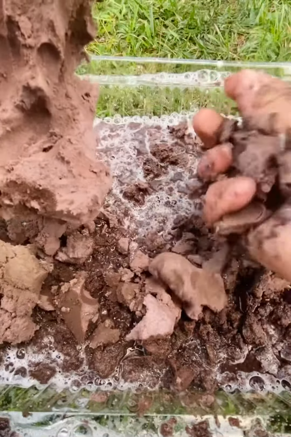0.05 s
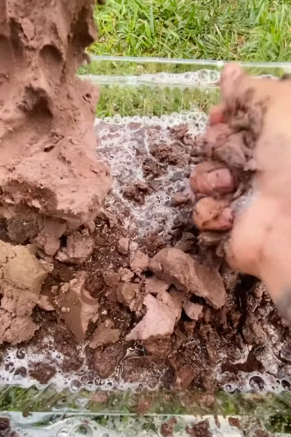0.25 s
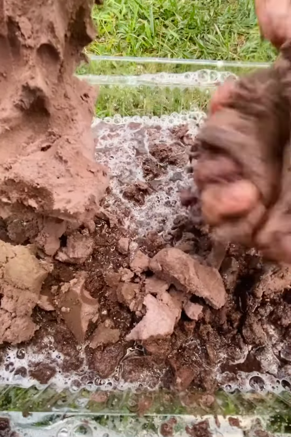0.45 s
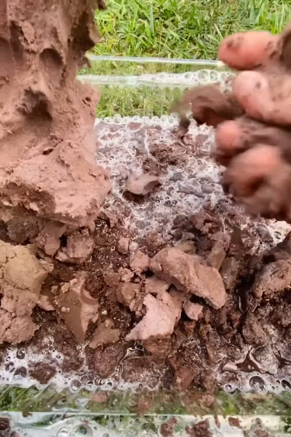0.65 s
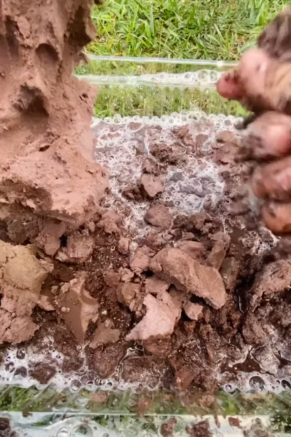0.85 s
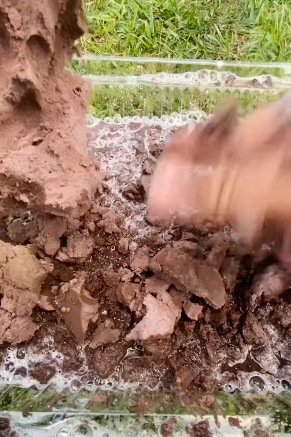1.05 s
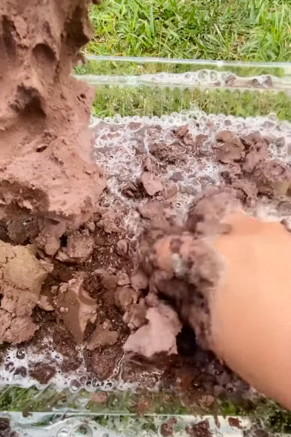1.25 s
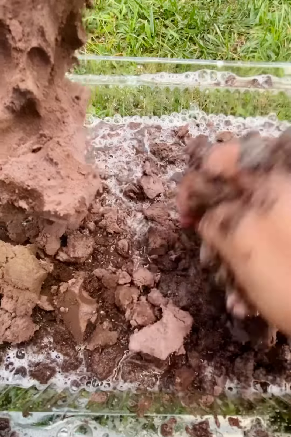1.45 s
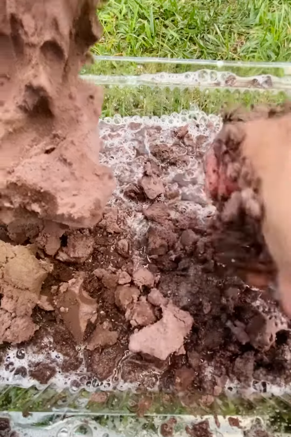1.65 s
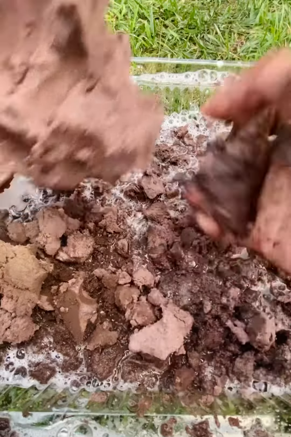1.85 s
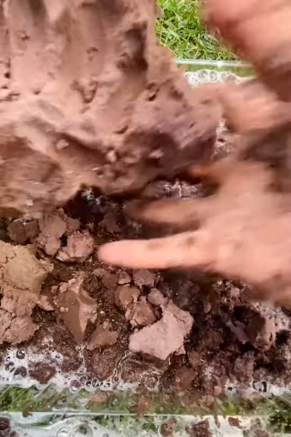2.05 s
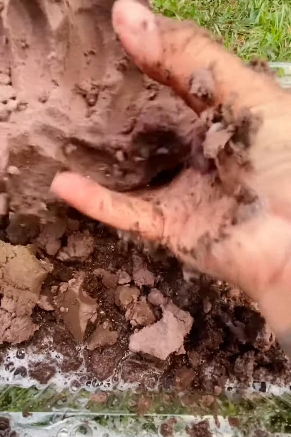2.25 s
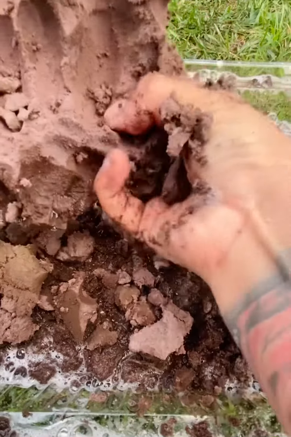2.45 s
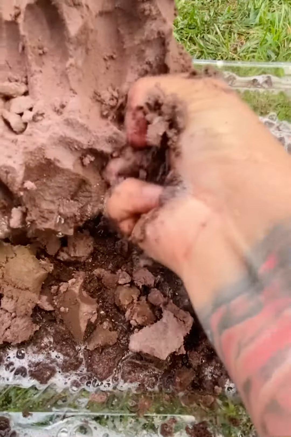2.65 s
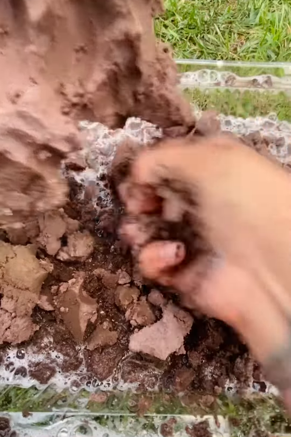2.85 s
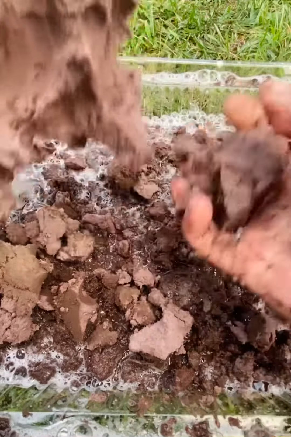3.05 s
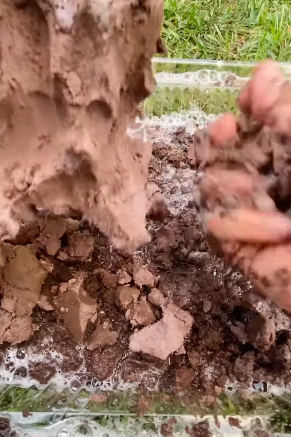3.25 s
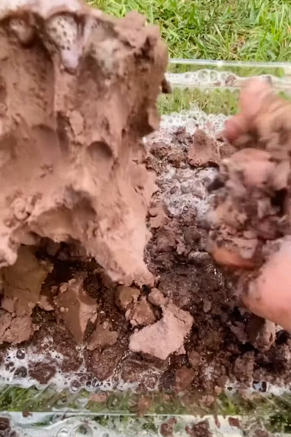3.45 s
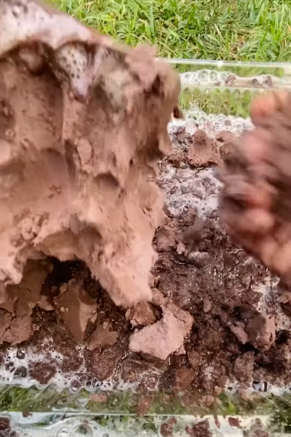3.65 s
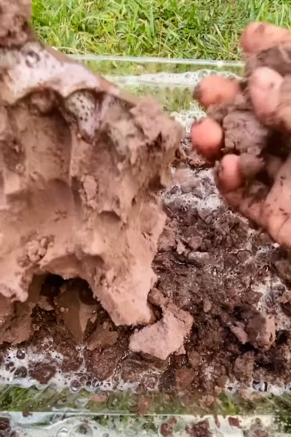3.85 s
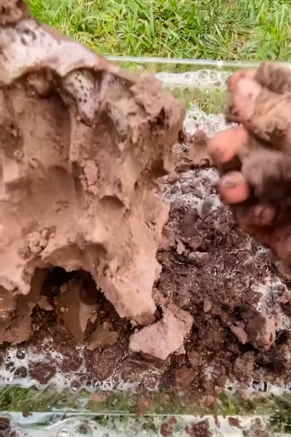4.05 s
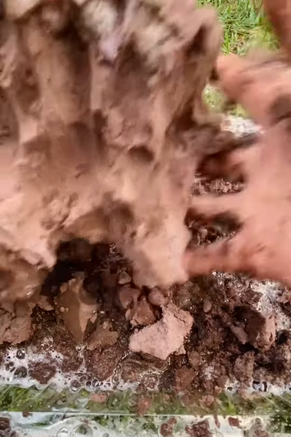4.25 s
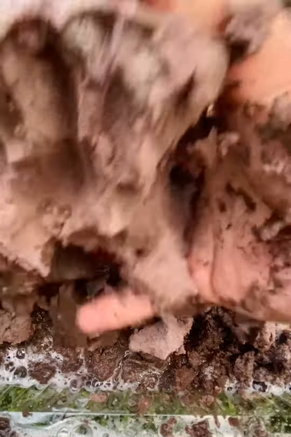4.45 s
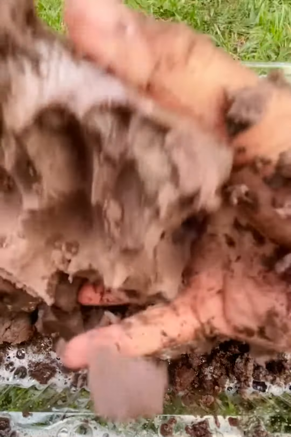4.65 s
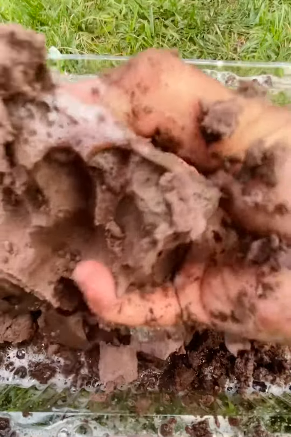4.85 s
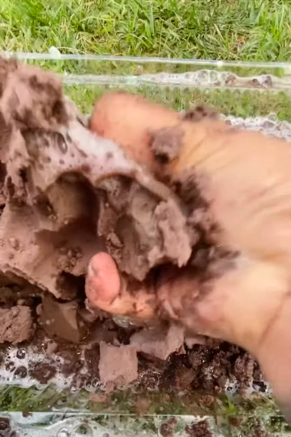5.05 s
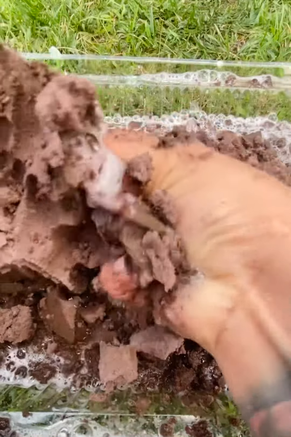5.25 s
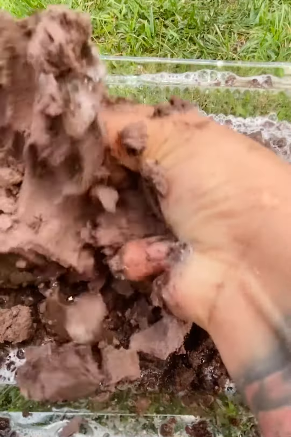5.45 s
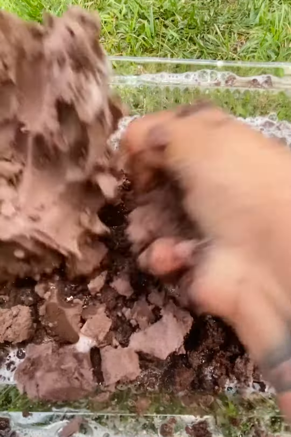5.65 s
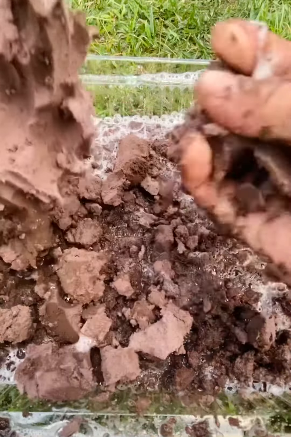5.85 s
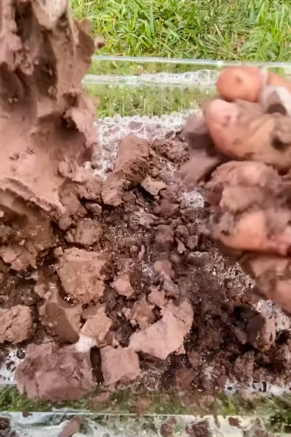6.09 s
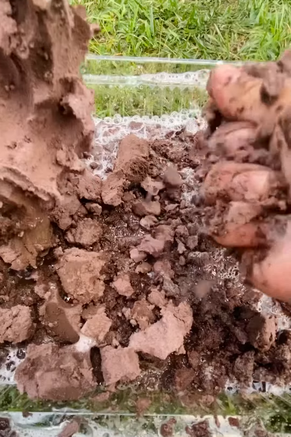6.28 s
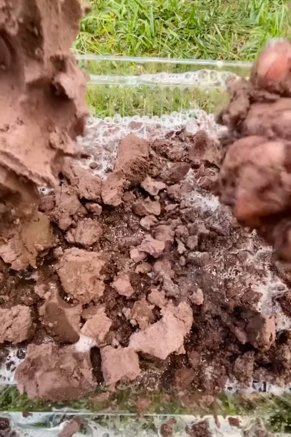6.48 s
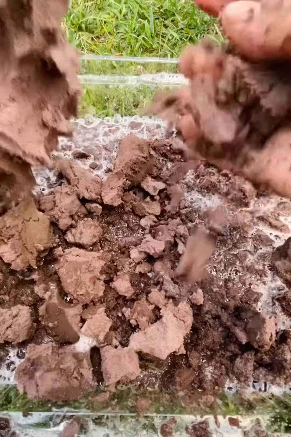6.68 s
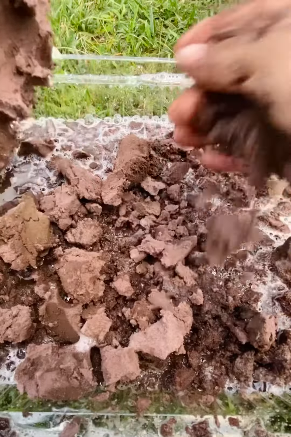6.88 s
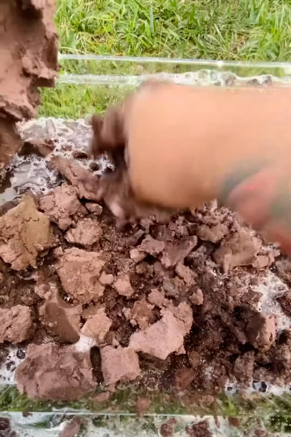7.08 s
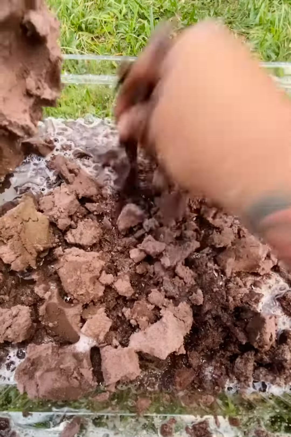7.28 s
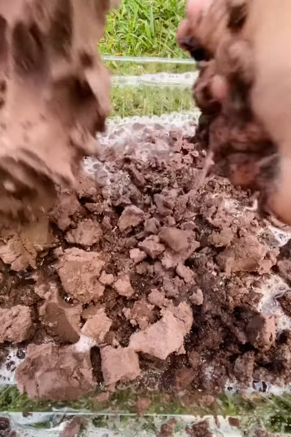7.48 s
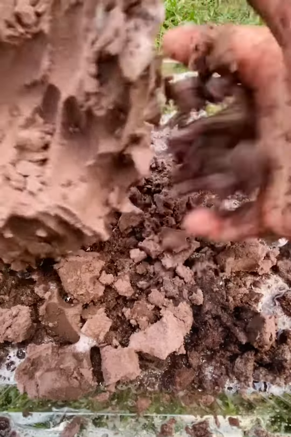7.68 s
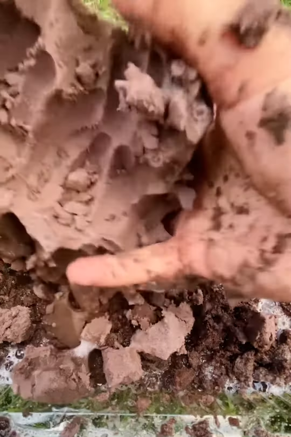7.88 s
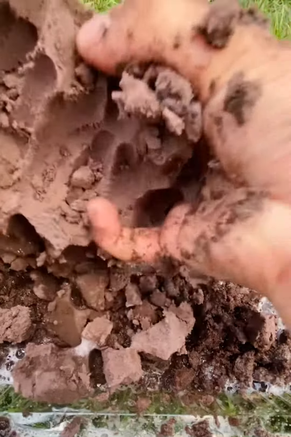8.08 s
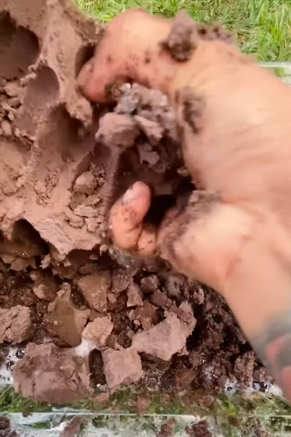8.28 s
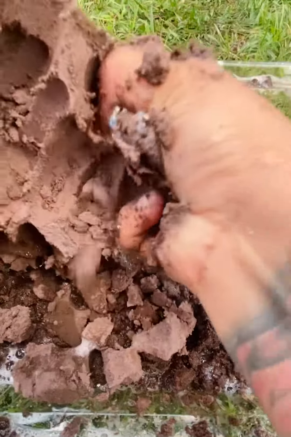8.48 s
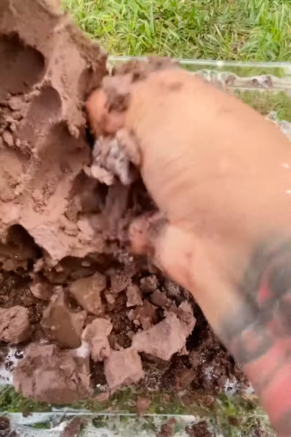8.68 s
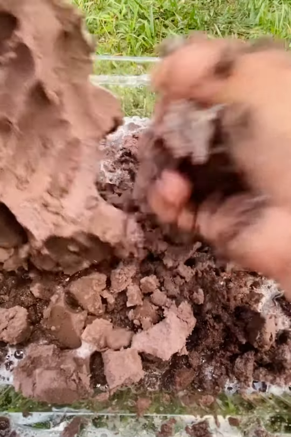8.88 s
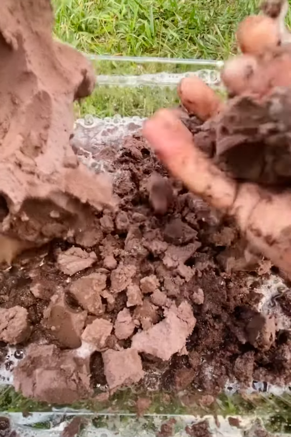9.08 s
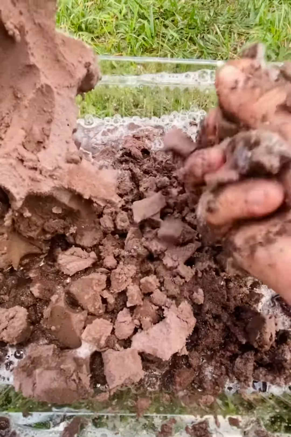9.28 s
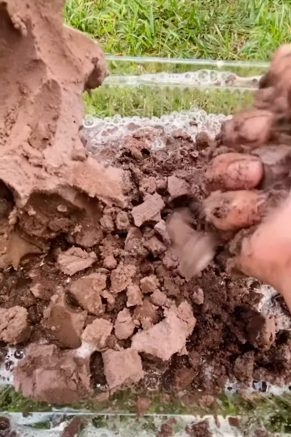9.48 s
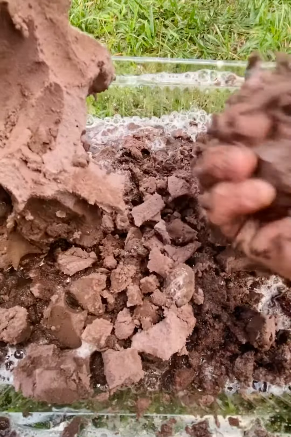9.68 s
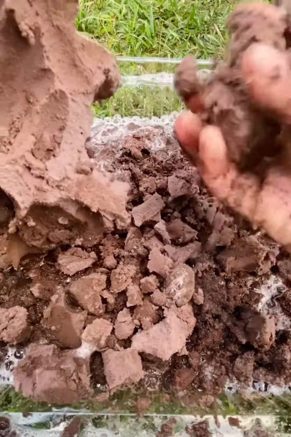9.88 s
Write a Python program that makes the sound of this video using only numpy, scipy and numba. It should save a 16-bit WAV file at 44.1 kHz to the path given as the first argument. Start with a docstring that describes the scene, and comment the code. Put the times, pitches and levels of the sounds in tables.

```python
"""Outdoors, a hand works a block of soaked floral foam over a soapy tub, close to a phone with two microphone ports.
A low distant rumble, hum and drone lie underneath throughout: filtered noise and wandering sine tones.
From the start the fist crushes lumps: noise ticks crackle and snap, suds squirt and pop, and crumbs plop.
Near 2.3, 4.7 and 7.9 s the fingers bite in and tear a lump off, adding a deeper crunch and damped thuds.
In the second and third tear the hollow of the palm rings as well; crushing resumes after each."""
import sys
import numpy as np
from scipy import signal
from scipy.fft import rfft, irfft, next_fast_len
from scipy.io import wavfile
from numba import njit

SR = 44100
rng = np.random.default_rng(int(sys.argv[2]) if len(sys.argv) > 2 else 0)


def waveform_to_disk(signal):
    """Save audio, clipped to [-1, 1], as 16-bit WAV at the path in sys.argv[1]."""
    frames = np.transpose(np.atleast_2d(signal))
    scaled = np.clip(frames, -1, 1) * 32767
    samples = np.round(scaled).astype(np.int16)
    wavfile.write(sys.argv[1], SR, samples)


N = 437913
TIME = np.arange(N) / SR
FREQ = np.fft.rfftfreq(next_fast_len(N + SR // 4, True) // 2 * 2, 1 / SR)


def undb(db):
    """Decibels to gain."""
    return 10 ** (np.asarray(db) / 20)


def over_freq(hz, values):
    """Values joined on a log-frequency axis."""
    return np.interp(np.log(FREQ + 1), np.log(hz), values)


def filtered(x, response):
    """Apply a frequency response."""
    return irfft(rfft(x, 2 * (len(FREQ) - 1)) * response)[..., :N]


def colour(x, points):
    """Causal filter through (Hz, dB) points that keeps the power of white noise."""
    gain = undb(over_freq(*np.transpose(points)))
    # folding the cepstrum gives minimum phase: no sound before the break
    cepstrum = irfft(np.log(gain / np.sqrt(np.mean(gain ** 2))))
    half = len(cepstrum) // 2
    cepstrum[1:half] *= 2
    cepstrum[half + 1:] = 0
    return filtered(x, np.exp(rfft(cepstrum)))


def walk(rate):
    """Smooth random wander with a spread near 1, taking `rate` new values per second."""
    steps = rng.standard_normal(N // 20)
    return np.interp(TIME * rate, np.arange(len(steps)), steps) * np.sqrt(3 / 2)


def ring_down(power, decay_s):
    """Let each packet of energy die away exponentially; decay_s is that of the amplitude."""
    keep = np.exp(-2 / (decay_s * SR))
    return signal.lfilter([1 - keep], [1, -keep], power + 1e-18)


@njit
def resonance(x, hz, width):
    """Band-pass whose centre may move with every sample; width is bandwidth over centre."""
    y, band, low = np.empty(len(x)), 0., 0.
    for i in range(len(x)):
        g = np.tan(np.pi * min(hz[i] / SR, .45))
        v = (band + g * (x[i] + 1e-18 - low)) / (1 + g * (g + width))
        band, low, y[i] = 2 * v - band, low + 2 * g * v, width * v
    return y


def ringing(pair, hz, width):
    """Both streams through the same resonance."""
    return np.array([resonance(x, hz * np.ones(len(x)), float(width)) for x in pair])


# Rumble far from the microphone. Each row: frequency in Hz, relative density in dB per Hz.
RUMBLE_SPECTRUM = [(20, -25.5), (40, -10), (55, 0), (70, 5), (100, -0.5), (130, 1), (200, -6), (260, -10),
                   (380, -18), (560, -29), (1200, -49.5), (3000, -51), (11000, -52), (15000, -84)]
# Distant machine hum. Each row: frequency in Hz, level in dB, both before a slight wander.
HUM_TONES = [(56, -50), (120, -59.5), (177.5, -58.5), (237.5, -56), (297, -63.5), (335, -66.5)]
# Far-off engine drifting in speed. Each row: time in seconds, frequency in Hz, level in dB, before wander.
ENGINE_DRONE = [(0, 121, -48), (.9, 120.7, -54.5), (1.9, 144, -50), (3.3, 172.1, -55), (3.7, 134.6, -49),
                (4.05, 122.4, -46.5), (4.4, 122.1, -49.5), (5.1, 160.8, -50), (5.8, 150, -69),
                (7.4, 113.6, -67), (8, 113.5, -49), (8.9, 120, -47), (9.4, 123, -48.5), (9.93, 127.1, -48)]


def outdoors():
    """Far-off rumble as shaped noise, nearly alike at both ports in the bass; hum and engine as wandering sines."""
    swell_db = .6 * walk(5)
    mid, side = colour(rng.standard_normal((2, N)), RUMBLE_SPECTRUM) * undb(-44.0 + swell_db)
    side = filtered(side, undb(over_freq([60, 250, 700], [-27, -18, -4])))
    times, drone_hz, drone_db = np.transpose(ENGINE_DRONE)
    drone = (np.interp(TIME, times, drone_hz), np.interp(TIME, times, drone_db))
    hum = 0
    for hz, db in HUM_TONES + [drone]:
        level = undb(db + 1.3 * walk(2)) * np.sqrt(2)
        cycles = np.cumsum(hz + 0.3 * walk(4)) / SR
        hum = hum + level * np.sin(2 * np.pi * cycles)
    return mid + hum + side * np.array([[1], [-1]])


# Soft wash in the distance. Each row: time in seconds, level in dB.
WASH_LEVEL = [(0, -61), (.3, -63.5), (.8, -69), (1.6, -60.5), (2.1, -68.5), (2.9, -65), (3.6, -76),
              (4.15, -63.5), (4.7, -70), (5.55, -66), (6.2, -77), (7, -68), (9.93, -72)]


def far_wash(hz=730, width=0.84):
    """A soft, distant midrange wash that slowly comes and goes: noise through two equal resonances."""
    wash = ringing(ringing(rng.standard_normal((2, N)), hz, width), hz, width)
    return wash / np.std(wash) * undb(np.interp(TIME, *np.transpose(WASH_LEVEL)))


# The clearest brittle snaps, close to the phone. Each row: start in seconds, relative level over a
# millisecond in dB, decay in seconds, body against treble in dB before colouring, ring of the piece in Hz.
CLEAR_SNAPS = [(0.0283, -20, 0.0021, -26, 9100), (0.0449, -16.5, 0.0034, -2.5, 9000),
               (0.061, -15, 0.0023, -10, 6400), (0.0856, -17, 0.0014, -3, 6800),
               (0.128, -20, 0.0009, -20, 5200), (0.139, -20, 0.0036, -20, 5500),
               (0.1791, -31, 0.0005, -9, 8500), (0.2704, -32, .001, -9, 4500),
               (0.32, -37, 0.00096, 1, 3800), (0.4118, -44, .001, -13, 4040),
               (1.2951, -23, 0.00094, -1, 3980), (1.391, -24, 0.0034, -1, 5600),
               (1.4375, -16, 0.00048, -33, 9000), (1.4955, -18, 0.0012, -25, 9400),
               (1.5029, -12.5, 0.00074, -30, 6100), (1.521, -14.5, 0.0013, -25, 9600),
               (1.7566, -37, .001, -10, 5500), (1.8733, -46, .001, -9, 4100),
               (2.0647, -23.5, 0.0055, -21, 7100), (2.0726, -27, 0.0023, -2, 7300),
               (2.1416, -28, 0.003, -21, 5300), (2.2949, -10.5, 0.001, -21, 5100),
               (2.3077, -12, 0.0028, -10, 7200), (2.3758, -14, 0.0011, 7, 1500),
               (2.3962, -9.5, 0.00058, -16, 8800), (2.4144, -8.5, 0.0024, -11, 8300),
               (2.4816, -7.5, 0.0019, -1, 3800), (2.5001, -6, 0.0011, -8, 6500),
               (2.5164, -11.0, 0.0016, 0, 2300), (2.5872, -3, 0.0018, -12, 5800),
               (2.5895, -4, 0.0017, -7, 5500), (2.5981, -3, 0.0039, -6, 5300),
               (2.6044, -3.5, 0.0025, -1, 2800), (2.6104, -3.5, 0.00093, 0, 2480),
               (2.6316, -12, 0.0043, -7, 9700), (2.712, -34, 0.0012, -10, 6000),
               (2.9178, -29.5, 0.0038, -16, 8700), (2.9723, -37, .002, -10, 2300),
               (3.0452, -34, 0.0011, -13, 5500), (3.151, -22, 0.0029, -8, 8900),
               (3.1669, -23.5, 0.004, -16, 5400), (3.197, -20, 0.0014, -12.5, 6160),
               (3.215, -17, 0.0035, 0, 5500), (3.2628, -15.5, 0.00097, 2, 5470),
               (3.2871, -17.5, 0.001, -12, 4300), (3.3104, -13, 0.0025, -7.5, 2420),
               (3.4074, -33, 0.00096, 0, 4500), (3.4722, -34, .0008, -17, 7870),
               (3.4902, -40, .001, -1.5, 5000), (3.4967, -27.5, .001, 0, 2500),
               (3.7706, -28, 0.00092, -23, 9900), (3.8039, -22, 0.004, -20, 9200),
               (3.8809, -22.5, 0.0017, -5, 5300), (3.8976, -19.5, 0.0037, -11, 5340),
               (3.921, -27, 0.0018, -11, 5500), (4.1045, -29, 0.0037, 0, 1318),
               (4.3851, -17.5, 0.0022, -12, 5170), (4.3899, -11, 0.0042, -9.5, 10000),
               (4.3955, -7, 0.0012, -25, 10200), (4.5054, -17.5, 0.0049, -17, 7800),
               (4.515, -16, 0.0029, -19, 8100), (4.6096, -36, .0008, -10, 6500),
               (4.6493, -15.5, 0.0031, -3, 6270), (4.6553, -17, 0.0026, -8, 4800),
               (4.6755, -19, 0.0006, -11, 6600), (4.7205, -11.5, 0.0012, -6, 5100),
               (4.7498, -13, 0.0022, -2.5, 2000), (4.7748, -6.5, 0.0011, -4, 7300),
               (4.7851, -16, 0.00099, 6, 6000), (4.7942, -12.5, 0.0025, 5, 1600),
               (4.8148, -7, 0.00076, -1, 8500), (4.8345, -5, 0.00067, -8, 5300),
               (4.9381, -29, 0.0018, -5, 3200), (5.0206, -3.5, 0.00069, -19, 7550),
               (5.0401, -20.5, 0.00078, -3, 2400), (5.0762, -16, 0.0015, -12, 5000),
               (5.0924, -9, 0.0037, -6.5, 7760), (5.1, -7, 0.0031, -1, 3100),
               (5.1182, -4, 0.0008, -14, 2200), (5.1404, -3.5, 0.0018, -1.5, 2300),
               (5.1525, -7, 0.0028, -2, 7100), (5.1602, -2, 0.0033, 0, 1300),
               (5.1644, -0.5, 0.0038, -3, 4340), (5.1718, -7, 0.0045, -5, 8700),
               (5.2504, -22.5, 0.0018, 9, 1900), (5.2723, -4.5, 0.00092, 2, 2720),
               (5.3048, -13.5, 0.001, -4, 6200), (5.414, -15, 0.0011, -14, 6940),
               (5.4163, -7, .0016, -8, 7040), (5.4286, -14, 0.0018, -1.5, 2600),
               (5.4427, -2, 0.0016, -13, 7040), (5.4453, -3, 0.0032, -6, 7200),
               (5.4552, -19, 0.0014, -6, 5200), (5.4715, -15, 0.0012, -2, 2000),
               (5.4935, -27, .0007, -14, 5000), (5.4978, -11.5, 0.00046, -10, 7440),
               (5.5082, -25, .0008, -4, 6000), (5.6761, -29, 0.0005, -21.5, 7800),
               (5.7199, -26.5, 0.0011, -4, 5700), (5.9287, -19, 0.0032, 2, 3800),
               (5.9968, -15.5, 0.0015, -7, 2510), (6.0076, -16, 0.001, -5, 6700),
               (6.0221, -24, 0.0011, -20, 5670), (6.0601, -14.5, 0.0009, -18, 5300),
               (6.1837, -14.5, 0.00048, -12, 3500), (6.2715, -16, 0.00092, -6.5, 4360),
               (6.3831, -26, 0.0012, -9, 4500), (6.4699, -32, 0.0011, -7, 5500),
               (6.7777, -30, 0.0012, -3, 5000), (6.9915, -47, 0.0024, -8, 4800),
               (7.1987, -27.5, 0.0012, -2, 3400), (7.2997, -22.5, 0.0011, 1, 8600),
               (7.3793, -33, 0.0009, -13, 5500), (7.5447, -28.5, 0.0018, -12, 4520),
               (7.9211, -22, .0015, -2, 5470), (7.951, -19.5, 0.001, -5.5, 5240),
               (8.0224, -10.5, 0.0016, -1, 1290), (8.0419, -14, 0.0011, -17, 5700),
               (8.1029, -7, 0.0048, -4, 5000), (8.1242, -4, 0.00066, -7, 9400),
               (8.1374, -12, 0.0011, -3, 5900), (8.2143, -6, 0.0013, 9, 9200),
               (8.3328, -9.5, 0.0027, 6, 1300), (8.3516, -7, 0.0012, -1, 2210),
               (8.4012, -14, 0.0017, -11, 7200), (8.416, -12, 0.0015, -11, 9500),
               (8.42, -7.5, 0.0016, -7, 3900), (8.4853, -16, .001, -6, 6000),
               (8.5142, -3.5, 0.0011, -20, 7671), (8.5238, -9, 0.0013, -4, 1800),
               (8.5479, -6.5, 0.0036, -6, 7800), (8.5815, -0.5, 0.0014, -15, 9100),
               (8.5985, -2, 0.0025, -11, 5260), (8.6072, -3, 0.0014, -5, 4760),
               (8.6106, -0.5, 0.0016, -1, 5000), (8.8706, -5.5, 0.0011, -5, 1490),
               (8.8922, -24, .002, -10, 7580), (8.9134, -11, 0.0005, -1, 2200),
               (8.9768, -27, 0.00082, 0, 3700), (9.1603, -26, 0.0025, -1, 2600),
               (9.1718, -19.5, 0.0009, 0, 4030), (9.2157, -18, 0.0006, -6, 7440),
               (9.2381, -16.5, 0.0011, -18, 10000), (9.2452, -22, 0.0014, -5, 4570),
               (9.2871, -20, 0.0005, -28, 6900), (9.3144, -16.0, 0.0029, -11, 4800),
               (9.3209, -21, 0.0018, -9, 6800), (9.3788, -24, 0.0007, -12, 4860),
               (9.4133, -23.0, 0.0026, -22, 4000), (9.4841, -25, 0.00077, -15, 6460),
               (9.9147, -11.5, 0.001, -6, 2550)]
# Treble of a snap. Each row: frequency in Hz, relative density in dB per Hz.
SNAP_TREBLE_SPECTRUM = [(700, -15.5), (2000, -12.5), (3000, -12.5), (4500, 1), (5500, 6), (7500, 0),
                        (11000, 0.5), (15500, -6.5)]
# Knock of the foam's body. Each row: frequency in Hz, relative density in dB per Hz.
SNAP_BODY_SPECTRUM = [(100, -5.5), (500, -2.5), (1000, 0.5), (1900, 6), (2600, 12), (3500, 8), (8000, -43)]
PIECE_WIDTH, PIECE_RING = .55, .55  # bandwidth over centre, ring against dry burst
SNAP_RISE_S, SCATTER_DB, SCATTER_S = .00012, -25, .004


def lesser_snaps(pressure, decay_s=0.0013, body_db=-6, low_hz=1600, high_hz=8000, count=240):
    """Smaller pieces crack and loose crumbs tick at random, standing out most when the hand is slack."""
    when, size, body, pitch = rng.random((count, 4)).T
    at = (when * (N - 1)).astype(int)
    # slightly less than in step with the pressure
    db = .85 * 20 * np.log10(pressure[at] + 1e-9) - 1 + 7 * size ** 2
    bodies_db = body_db + 10 * (body - .5)
    hz = low_hz * (high_hz / low_hz) ** pitch
    return list(zip(at / SR, db, np.full(count, decay_s), bodies_db, hz))  # same columns as CLEAR_SNAPS


def snapping(pressure):
    """Larger pieces crack: a brief noise burst rings the piece at its own pitch, with a knock of the foam's body."""
    treble, body = np.zeros((2, 2, N))
    for s, db, decay_s, body_db, hz in list(CLEAR_SNAPS) + lesser_snaps(pressure):
        start = int(s * SR)
        age = TIME[:min(SR // 50, N - start)] + 1 / SR
        # each snap scatters briefly between palm and tub
        fade = np.exp(-age / max(decay_s, 1 / SR)) + undb(SCATTER_DB) * np.exp(-age / SCATTER_S)
        burst = rng.standard_normal((2, len(age))) * fade * (1 - np.exp(-age / SNAP_RISE_S))
        burst += PIECE_RING * ringing(burst, hz, PIECE_WIDTH)
        # fix the energy, then share it between treble and body
        burst /= np.sqrt(np.sum(burst ** 2, axis=1, keepdims=True))
        burst *= undb(db) * np.sqrt(SR / 1000 / (1 + undb(body_db) ** 2))
        treble[:, start:start + len(age)] += burst
        body[:, start:start + len(age)] += burst * undb(body_db)
    return undb(-2.5) * colour(treble, SNAP_TREBLE_SPECTRUM) + undb(-3.76) * colour(body, SNAP_BODY_SPECTRUM)


# The fist closes on a lump. Each row: greatest pressure in seconds, relative crackle level in dB,
# rise in seconds and fall in seconds (each over 10 dB), suds against crackle in dB.
FIST_SQUEEZES = [(.04, -26.5, 0.081, 0.11, -20), (.21, -31.5, 0.14, 0.062, -13.5),
                 (.48, -48, 0.1, 0.038, -7), (.65, -28, 0.024, 0.018, -17), (.79, -37.5, 0.16, 0.085, -16),
                 (1.0, -56.5, 0.24, 0.072, -1), (1.3, -46.5, 0.11, 0.097, 0.5),
                 (1.385, -38, .03, 0.032, -9), (1.491, -32.5, 0.19, 0.07, -19),
                 (1.78, -47, 0.038, .04, -9.5), (1.86, -47.5, 0.055, 0.034, -14),
                 (2.65, -41, .03, 0.091, -21), (2.77, -40, 0.12, 0.042, -10.5),
                 (2.889, -43, 0.046, 0.028, -3), (3.05, -45.5, 0.09, 0.12, -25),
                 (3.204, -27.5, 0.059, 0.16, -9.5), (3.49, -43.5, 0.059, 0.054, -10),
                 (3.68, -44.5, 0.088, 0.11, -11.5), (3.89, -31.5, 0.083, 0.078, -11.5),
                 (4.06, -46.5, 0.073, 0.05, -10), (4.2, -65.5, 0.066, 0.053, -4),
                 (4.278, -39.5, 0.0064, .02, -2.5), (4.303, -36.5, 0.02, 0.028, -4.5),
                 (4.394, -33.5, 0.023, 0.07, -3.5), (4.512, -31, 0.031, 0.0084, -6.5),
                 (4.657, -34.5, 0.074, 0.057, -2), (5.495, -29.5, 0.082, 0.016, -11),
                 (5.55, -56, 0.033, 0.091, -9), (5.7, -42.5, 0.045, 0.097, -6.5),
                 (5.924, -32.5, 0.052, 0.1, -3.5), (6.01, -29.5, .03, 0.09, -20),
                 (6.19, -32.5, 0.12, 0.11, -13), (6.355, -33.5, 0.051, 0.053, -14),
                 (6.52, -46.5, 0.18, 0.097, -10), (6.74, -38.5, 0.076, 0.091, -11.5),
                 (6.9, -51.5, 0.07, 0.051, -9.5), (7.078, -51.5, 0.013, 0.09, -1.5),
                 (7.15, -60.5, .04, 0.054, 9.5), (7.225, -41.5, 0.038, 0.13, 0),
                 (7.329, -36, 0.1, 0.078, -12.5), (7.621, -50, 0.24, 0.067, -6.5),
                 (7.79, -34.5, 0.015, 0.015, 2), (7.865, -42, 0.042, 0.069, 0.5),
                 (8.644, -29.5, 0.058, 0.03, -6), (8.86, -37, 0.047, 0.092, -16),
                 (8.98, -43, 0.2, 0.16, -9), (9.18, -33.5, 0.083, 0.19, -9),
                 (9.32, -29.5, 0.058, 0.13, -17), (9.48, -32.5, 0.13, 0.038, -17),
                 (9.629, -43.5, 0.028, 0.042, -23), (9.73, -47, 0.046, 0.068, -14),
                 (9.9, -36, 0.051, 0.092, -22.5)]
SQUEEZE_ROUNDNESS = 1.39  # 1 = pointed swell, 2 = bell
RESTING_DB = -77  # crumbs go on settling between squeezes


def squeezing():
    """Each squeeze swells and slackens; gains of crackle and of suds, summed as power."""
    crackle, suds = np.zeros((2, N))
    for s, db, rise_s, fall_s, wet_db in FIST_SQUEEZES:
        near = slice(max(int((s - 6 * rise_s) * SR), 0), int((s + 6 * fall_s) * SR))
        away = np.maximum((s - TIME[near]) / rise_s, (TIME[near] - s) / fall_s)
        power = undb(db - 10 * away ** SQUEEZE_ROUNDNESS) ** 2
        crackle[near] += power
        suds[near] += power * undb(wet_db) ** 2
    return np.sqrt(crackle + undb(RESTING_DB) ** 2), np.sqrt(suds)


def fracture(power):
    """Two unrelated streams of tiny breaks that carry the given power."""
    return np.sqrt(power) * rng.standard_normal((2, N))


def cells(rate, spread_db, top_db, decay_s, clump_db, smear):
    """Cell walls give way in clumps, `rate` per second: many tiny breaks, a few large ones; mean power 1."""
    breaks = rng.random(N) < rate / SR
    size_db = np.minimum(spread_db * rng.exponential(size=N), top_db) + clump_db * walk(110)
    energy = breaks * undb(size_db) ** 2
    # part of each tick scatters between palm, block and tub
    power = ring_down(energy, decay_s) + smear * ring_down(energy, 0.0065)
    return fracture(power / power.mean())


# Close surface crackle. Each row: frequency in Hz, relative density in dB per Hz.
CRACKLE_SPECTRUM = [(100, -34), (550, -16.5), (1000, -17), (1700, -21), (2500, -12), (3200, -9.5),
                    (3900, -4.5), (4800, -5.5), (5250, 0), (5800, 0), (6300, -5), (7000, -2.5), (8200, -3),
                    (11000, -2.5), (12100, -8.5), (13000, -9), (15500, -48)]


def crushing(pressure):
    """Fine crackle from the lump in the fist: dense tiny breaks scaled by pressure."""
    grains = cells(rate=4400, spread_db=4.3, top_db=16.5, decay_s=.00055, clump_db=1.4, smear=.24)
    return colour(grains, CRACKLE_SPECTRUM) * pressure * undb(.5)


# Gaps between fingers and foam. Each row: resonance in Hz, bandwidth over centre.
FINGER_GAPS = [(850, 0.59), (1550, 0.57), (2400, 0.24), (4000, 0.1), (7400, 0.12), (9500, 0.15)]
GAP_SWING_DB, GAP_GLIDE_OCTAVES, GAP_MOVES_PER_S = 4.5, .13, 7


def between_fingers(sound):
    """Gaps between the moving fingers open, close and glide, so the colour of the crackle keeps shifting."""
    for hz, width in FINGER_GAPS:
        centre = hz * 2 ** (GAP_GLIDE_OCTAVES * walk(GAP_MOVES_PER_S))
        opening = undb(GAP_SWING_DB * np.tanh(walk(GAP_MOVES_PER_S)) - 1 / 2)
        sound = sound + (opening - 1) * ringing(sound, centre, width)
    return sound


def bubble(hz, decay_s, glide):
    """A damped ring that rises in pitch as it dies."""
    life = TIME[:int(6 * decay_s * SR) + 1] / decay_s
    return np.sin(2 * np.pi * hz * decay_s * life * (1 + glide * life)) * np.exp(-life)


def bubbles(level, low_hz, high_hz, cycles, db, count=1600):
    """Small wet films burst at random, each at its own pitch, dying over `cycles`; most are faint."""
    out = np.zeros(N + SR)
    for when, pitch, size in rng.random((count, 3)):
        hz = low_hz * (high_hz / low_hz) ** pitch
        ring = bubble(hz, cycles / hz, glide=0.0075)
        start = int(when * N)
        out[start:start + len(ring)] += size ** 4 * ring
    return out[:N] * level * undb(db) * np.ones((2, 1))


# Wet crumbs and drops that plop. Each row: start in seconds, pitch in Hz, relative level in dB, decay in seconds.
WET_PLOPS = [(.234, 666, -30.5, 0.0014), (.251, 800, -35, 0.0017), (.478, 1500, -40, 0.00089),
             (1.575, 1330, -32, 0.0011), (1.555, 600, -37, 0.0032), (1.624, 900, -45, 0.0017),
             (2.74, 760, -46, .002), (2.791, 517, -43, 0.0027), (2.884, 650, -41, 0.0018),
             (2.887, 1791, -44, 0.0017), (3.376, 525, -40, .003), (3.489, 1980, -39, .001),
             (4.096, 1490, -27.5, 0.0013), (4.715, 1140, -26, 0.0018)]


def plopping(spatter_db=-2, spatter_s=0.0073, spatter_width=0.55):
    """Single wet crumbs trap a pocket of air, a rising ring, and fall apart in a soft noise spatter."""
    out = np.zeros(N + SR)
    age = TIME[:SR // 20]
    for s, hz, db, decay_s in WET_PLOPS:
        ring = bubble(hz, decay_s, glide=0.03)
        noise = rng.standard_normal(len(age)) * np.exp(-age / spatter_s)
        plop = undb(spatter_db) * resonance(noise, np.full(len(age), float(hz)), spatter_width)
        plop[:len(ring)] += ring[:len(age)]
        out[int(s * SR):int(s * SR) + len(age)] += undb(db) * plop
    return out[:N]


# Suds squirting and wet crumbs slapping down. Each row: middle in seconds, relative level in dB,
# half length in seconds, ring of the opening in Hz.
SUDS_SQUIRTS = [(0.653, -32, 0.025, 2530), (1.301, -34, 0.013, 3300), (1.61, -58.5, 0.025, 2570),
                (3.23, -33, 0.032, 2450), (4.287, -40, 0.01, 1510), (4.305, -36, 0.0076, 1500),
                (4.643, -33, 0.0076, 2280), (4.89, -34, 0.045, 1890), (5.087, -40, 0.047, 2400),
                (5.925, -33, 0.022, 3700), (6.182, -35, 0.024, 3400), (6.355, -44, 0.014, 2500),
                (6.744, -38.5, 0.023, 3580), (6.81, -52, 0.041, 3700), (7.787, -45, 0.015, 3330),
                (7.861, -49, 0.017, 2530), (8.675, -50, 0.033, 2900), (9.196, -36, 0.027, 3800),
                (9.855, -52, 0.014, 2500), (9.913, -45, 0.022, 2450)]
# A gush of suds. Each row: frequency in Hz, relative density in dB per Hz.
GUSH_SPECTRUM = [(300, -47), (800, -16), (1500, -7.5), (2400, 0), (3400, 4.5), (4200, 1), (6000, -9),
                 (9000, 0), (14000, -24)]
# Water squelching through the pores. Each row: frequency in Hz, relative density in dB per Hz.
SQUELCH_SPECTRUM = [(200, -9.5), (550, -11.5), (750, -9), (1050, -8), (1500, -3), (1900, -2), (2450, 1),
                    (3050, -2), (4700, -11), (5500, 1), (6300, -9), (7200, -8), (14000, -34.5)]


def squirting(flow, ring=1.2, width=0.29):
    """Soapy water squelches through the pores, now and then in a short gush that rings the opening it leaves by."""
    grains = cells(rate=2000, spread_db=3.0, top_db=4.5, decay_s=0.0013, clump_db=2.0, smear=0.32)
    spray, gushes = colour(grains, GUSH_SPECTRUM), np.zeros((2, N))
    for s, db, half_s, hz in SUDS_SQUIRTS:
        near = slice(max(int((s - 5 * half_s) * SR), 0), int((s + 5 * half_s) * SR))
        opening = ringing(grains[:, near], hz, width) * np.sqrt(SR / np.pi / hz)
        gush = spray[:, near] / 2 + ring * opening
        gushes[:, near] += gush * undb(db) / (1 + ((TIME[near] - s) / half_s) ** 4)
    return gushes + flow * undb(0.5) * colour(grains, SQUELCH_SPECTRUM)


# Lumps breaking away and knocks on the block. Each row: start in seconds, pitch in Hz, relative level in dB,
# decay in seconds.
BLOCK_THUDS = [(1.501, 392, -37, 0.0076), (2.405, 99, -27, 0.024), (2.611, 200, -19, 0.0069),
               (2.921, 330, -32, 0.0078), (4.097, 303, -28, 0.011), (4.115, 89.3, -31, 0.0085),
               (4.284, 82, -37, 0.031), (4.755, 190, -28, .01), (5.168, 199, -21, .009),
               (5.365, 311, -28, .014), (5.446, 318, -12.5, 0.0044), (5.47, 164, -19, 0.0073),
               (8.213, 520, -23, .003), (8.42, 190, -20, 0.009), (8.611, 260, -10.5, 0.0049)]
# Dull rub of a thud. Each row: frequency in Hz, relative density in dB per Hz.
RUB_SPECTRUM = [(35, -30), (90, -2), (160, 5.5), (300, 1.5), (500, -7.5), (750, -10.5), (1500, -16),
                (5000, -29), (12000, -57)]


def thudding(rise_s=0.00071):
    """The damp block rings briefly as a lump lets go: a damped sine with a dull, crumbling noise rub."""
    rings, rub = np.zeros((2, N))
    for s, hz, db, decay_s in BLOCK_THUDS:
        start = int(s * SR)
        age = TIME[:SR // 4]
        fade = undb(db) * np.exp(-age / decay_s) * (1 - np.exp(-age / rise_s))
        rings[start:start + len(age)] += fade * np.sin(2 * np.pi * hz * age)
        rub[start:start + len(age)] += fade * rng.standard_normal(len(age))
    return undb(-3) * rings + undb(-3) * colour(rub, RUB_SPECTRUM)


# Fingers tear a lump off the block. Each row: bite in seconds, firmest grip in seconds, break in seconds,
# relative levels of crackle, crunch and suds in dB, tightening in dB per second, easing in dB per second,
# final rip in dB.
TORN_LUMPS = [(2.258, 2.564, 2.614, -22.5, -29, -31.5, 22.5, 32, 5),
              (4.727, 5.13, 5.41, -29, -37.5, -26, 13, 12.5, 12.5),
              (7.938, 8.216, 8.611, -23, -30.5, -26.5, 38, 7, 14.5)]
BITE_DB, BITE_S, APPROACH_DB_PER_S = 6.5, 0.017, 112  # jump as the crust gives, its length; the lighter touch before it
RIP_S, RELEASE_DB_PER_S = 0.0052, 284  # half length of the last rip; dying away after it
SLIP_DB, SLIPS_PER_S = 1, 28  # the foam gives way in fits and starts
DRAIN_DB_PER_S = 46  # past the firmest grip the lump runs out of suds
CRUST_DB = 7  # the block crunches less until the crust has given


def gripping():
    """Fingers bite into the block, tighten, ease off and rip the lump free; gains of crackle, crunch and suds."""
    crackle, crunch, suds = np.zeros((3, N))
    slip_db = SLIP_DB * walk(SLIPS_PER_S)
    for (bite_s, firm_s, break_s, crackle_db, crunch_db, suds_db,
         tighten_db_per_s, ease_db_per_s, rip_db) in TORN_LUMPS:
        easing = np.maximum(TIME - firm_s, 0)
        grip = slip_db - tighten_db_per_s * np.maximum(firm_s - TIME, 0) - ease_db_per_s * easing
        early = np.maximum(bite_s - TIME, 0)
        crust = np.minimum(early / BITE_S, 1)
        grip -= BITE_DB * crust + APPROACH_DB_PER_S * early
        grip -= RELEASE_DB_PER_S * np.maximum(TIME - break_s, 0)
        rip = rip_db / (1 + ((TIME - break_s) / RIP_S) ** 2)
        crackle += undb(crackle_db + grip)
        crunch += undb(crunch_db + grip - CRUST_DB * crust + rip)
        suds += undb(suds_db + grip - DRAIN_DB_PER_S * easing)
    return crackle, crunch, suds


# Crunch through the depth of the block. Each row: frequency in Hz, relative density in dB per Hz.
CRUNCH_SPECTRUM = [(50, -11.5), (130, 4.5), (300, 5.5), (560, -1.5), (750, 2), (1050, -4), (1500, -1),
                   (2300, -5.5), (3200, -4), (6000, -4), (14000, -43)]


def tearing(depth, grip):
    """Coarser breaks crackle at the surface and crunch through the block, with wet pockets bursting inside."""
    grains = cells(rate=2600, spread_db=4.1, top_db=12, decay_s=0.0007, clump_db=.5, smear=0.3)
    surface = grains * rng.choice([-1, 1], N)  # same breaks, unrelated waveform
    pockets = bubbles(depth, low_hz=587, high_hz=2800, cycles=1.8, db=12.0, count=3000)
    crunch = colour(grains, CRUNCH_SPECTRUM) * depth * undb(4.0)
    crackle = colour(surface, CRACKLE_SPECTRUM) * grip * undb(-0.2)
    return crunch + crackle + pockets


# Hollow of the palm closing round a lump. Each row: time in seconds, resonance in Hz, relative level in dB.
PALM_HOLLOW = [(5.1, 420, -60), (5.18, 440, -41), (5.24, 480, -51), (5.3, 520, -42), (5.37, 560, -41),
               (5.41, 660, -46), (5.44, 700, -90), (8.08, 800, -90), (8.2, 840, -39), (8.33, 820, -46),
               (8.42, 800, -90)]


def cupping(width=0.27):
    """Breaks deep inside the fist ring the hollow of the palm: noise through two gliding resonances."""
    times, hz, db = np.transpose(PALM_HOLLOW)
    centre = np.interp(TIME, times, hz)
    hollow = resonance(rng.standard_normal(N), centre, width)
    hollow = resonance(hollow, centre, 2 * width)
    return hollow / np.std(hollow) * np.interp(TIME, times, undb(db), left=0, right=0)


# The two microphone ports. Each row: frequency in Hz, likeness from 0 to 1, left lead in radians,
# left minus right in dB.
MICROPHONE_PORTS = [(281, 0.96, 0, 0), (514, 0.96, 1.25, 1.5), (970, 0.13, 1.5, -4.5),
                    (1440, 0.88, -0.25, 0.5), (1770, 1, -1.3, 0.5), (2615, 0.66, 2, -4), (3020, 1, 2, -1),
                    (4180, 0.36, 1.1, -5), (4750, 0.34, -2, -3), (5440, 0.9, 1.5, -6),
                    (6900, 0.88, 0.07, 0), (9120, 0, 3.5, 1), (11050, 0.77, 3, 1)]
ALIKE_HZ, OPPOSED_HZ = 160, 12300


def ports(near):
    """Close sound reaches the two ports with different delay, shading and scatter."""
    # the bass is the same at both; the top octave is set with left and right opposed in sign
    rows = [(ALIKE_HZ, 1, 0, 0)] + MICROPHONE_PORTS + [(OPPOSED_HZ, .99, np.pi, 0)]
    hz, *columns = np.transpose(rows)
    likeness, lead, balance_db = (over_freq(hz, c) for c in columns)
    likeness = np.clip(likeness, 0, 1)
    shared = filtered(near[0], likeness * np.exp(1j * lead) * undb(balance_db / 2))
    scattered = filtered(near[1], np.sqrt(1 - likeness ** 2) * undb(balance_db / 2))
    right = filtered(near[0], undb(-balance_db / 2))
    return np.array([shared + scattered, right])


def scene():
    """The foam in the hand, close by, over the outdoor background."""
    fist, fist_suds = squeezing()
    grip, depth, grip_suds = gripping()
    pressure, flow = np.hypot(fist, grip), np.hypot(fist_suds, grip_suds)
    suds = squirting(flow) + bubbles(flow, low_hz=1550, high_hz=5200, cycles=2.64, db=9)
    fizz = bubbles(pressure, low_hz=3250, high_hz=9700, cycles=4.6, db=1.5, count=2500)
    in_hand = between_fingers(crushing(fist) + tearing(depth, grip) + suds)
    foam = ports(in_hand + snapping(pressure) + fizz)
    foam = foam + plopping() + thudding() + cupping()  # these reach both ports alike
    return undb(0.5) * foam + outdoors() + far_wash()


TOP_HZ = 15750


def record(dry, knee_db=-21, release_s=0.44, squeeze=0.34):
    """The phone's gain falls and recovers with the smoothed power; it rounds the peaks and cuts both ends."""
    power = ring_down(np.mean(dry ** 2, axis=0), release_s)
    held = dry / (1 + power / undb(knee_db) ** 2) ** squeeze
    held = signal.sosfilt(signal.butter(2, 30, "highpass", fs=SR, output="sos"), held)
    rounded = np.tanh(1.3 * held) / 1.3
    return signal.sosfilt(signal.ellip(10, .2, 80, TOP_HZ, fs=SR, output="sos"), rounded)


dry = scene()
out = record(dry)
waveform_to_disk(out)
```